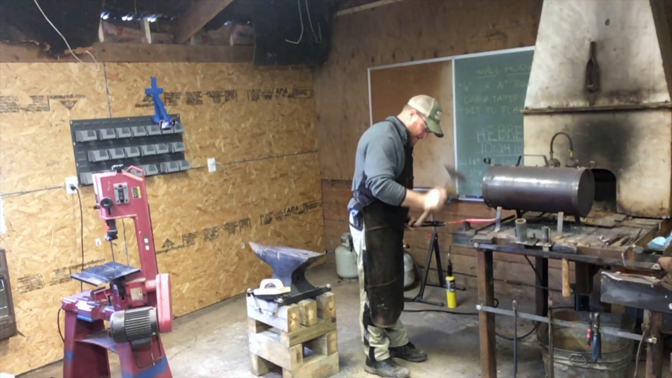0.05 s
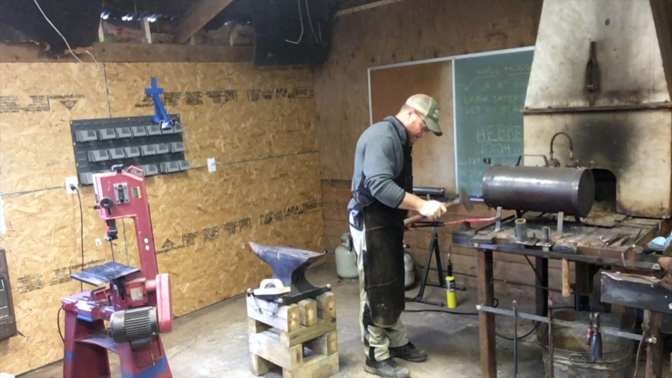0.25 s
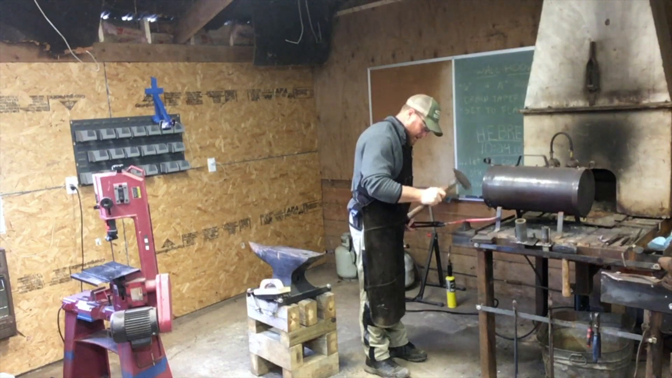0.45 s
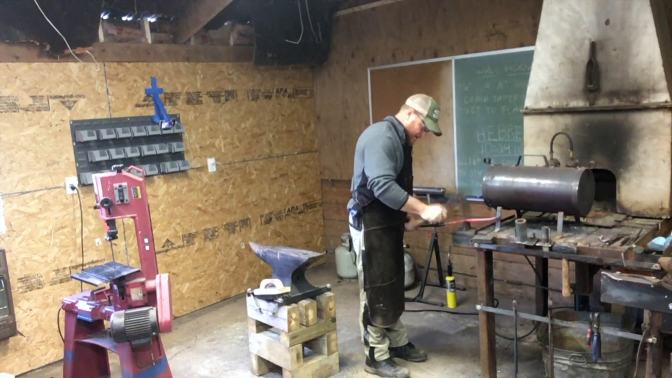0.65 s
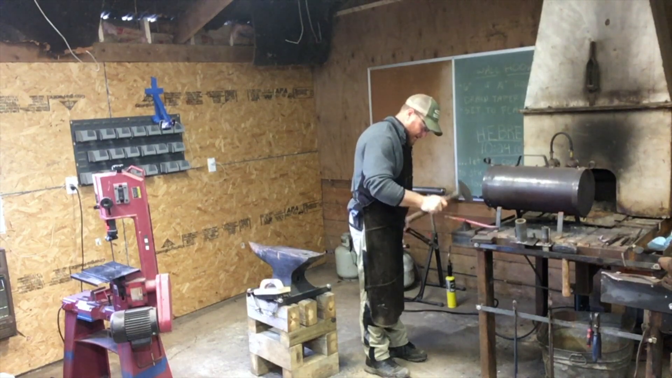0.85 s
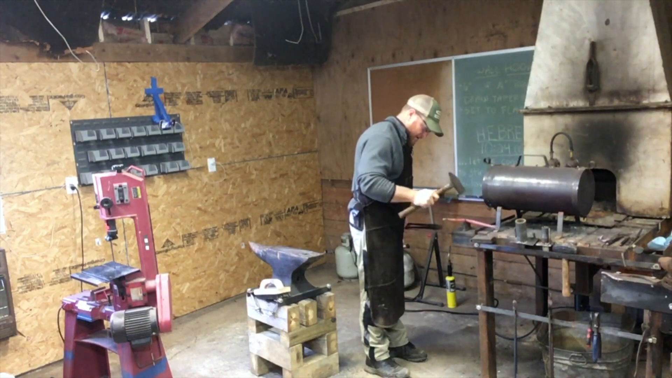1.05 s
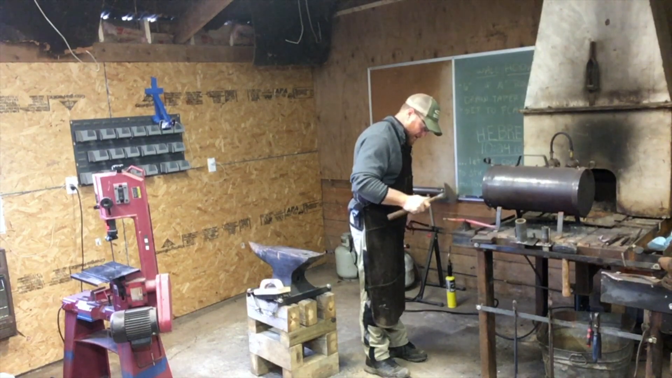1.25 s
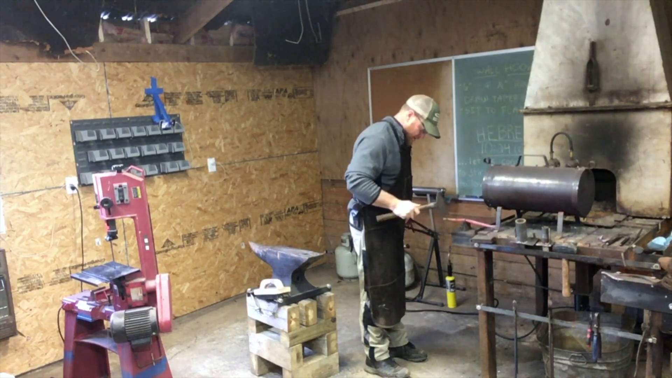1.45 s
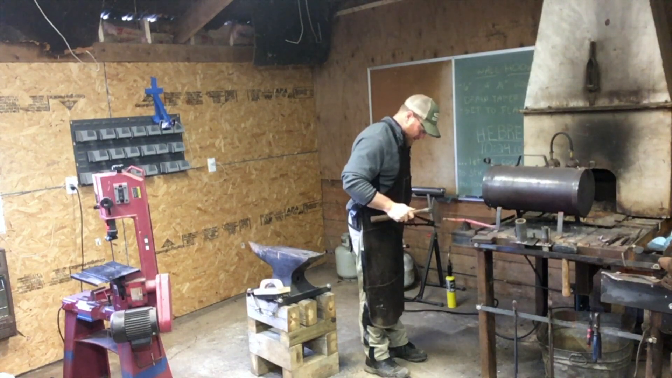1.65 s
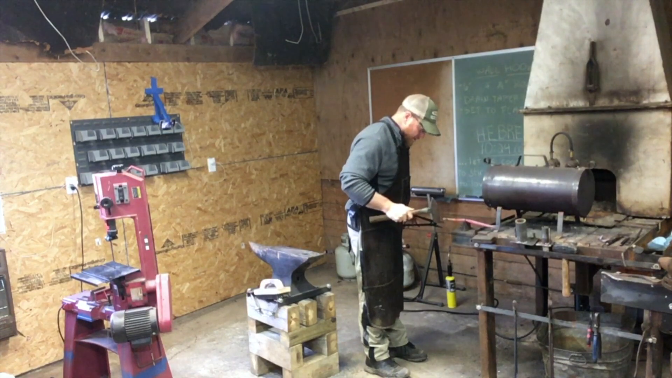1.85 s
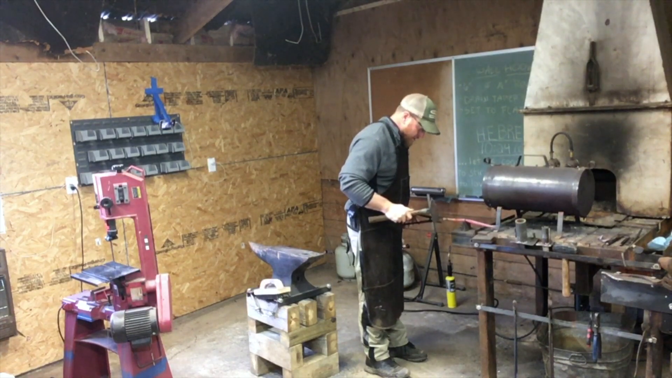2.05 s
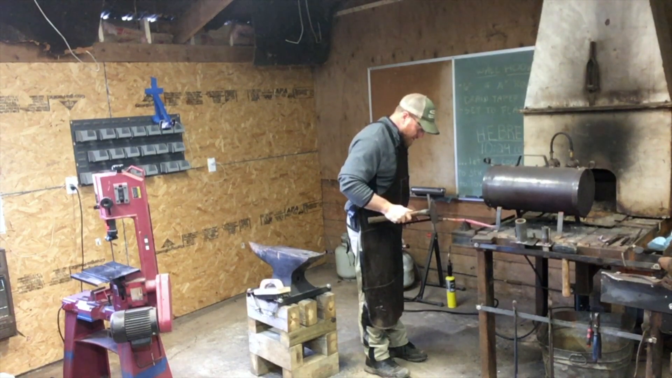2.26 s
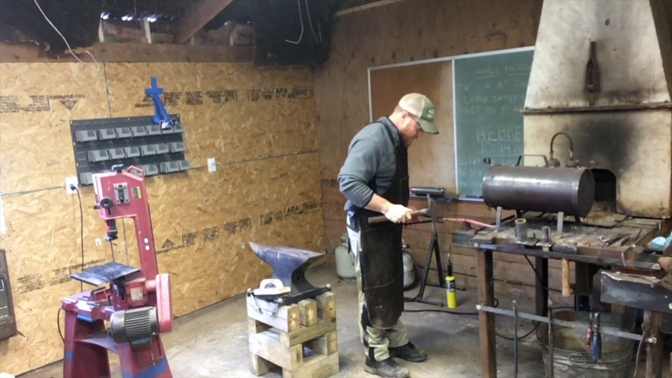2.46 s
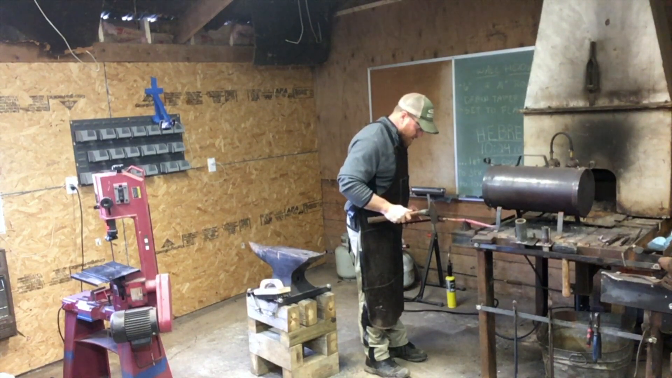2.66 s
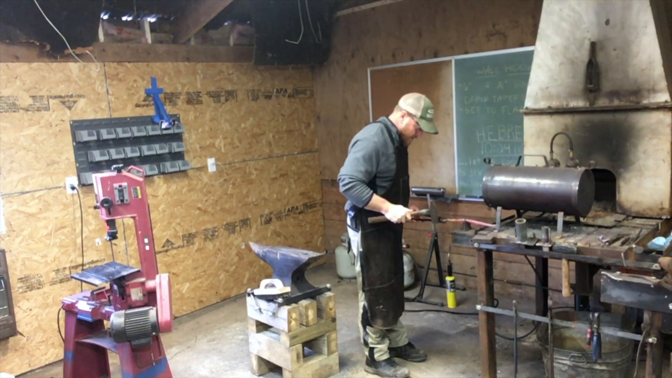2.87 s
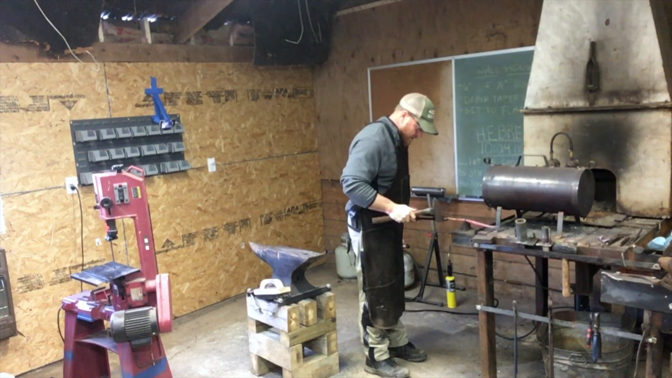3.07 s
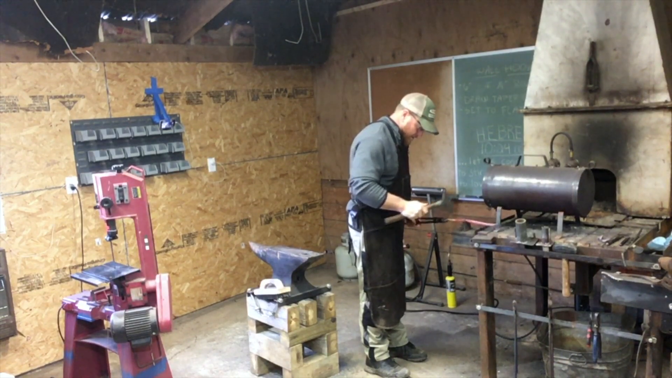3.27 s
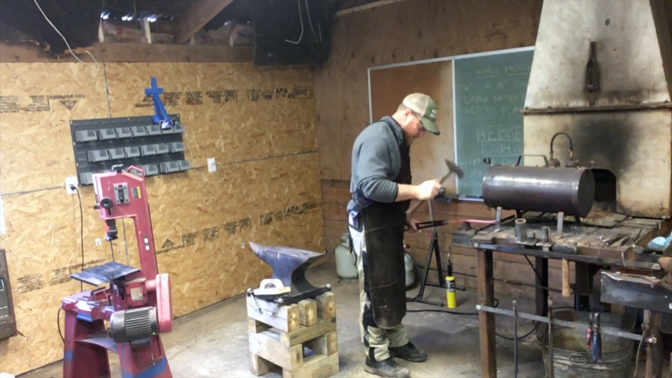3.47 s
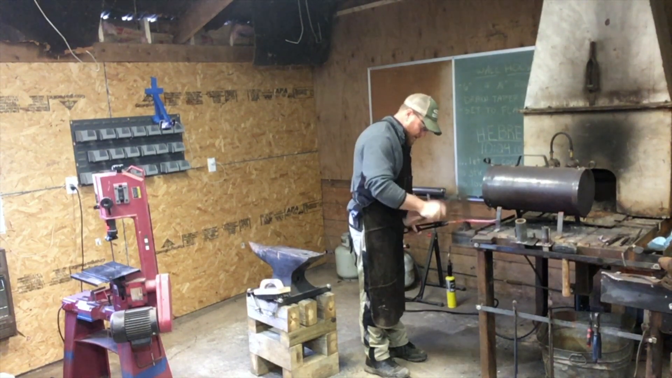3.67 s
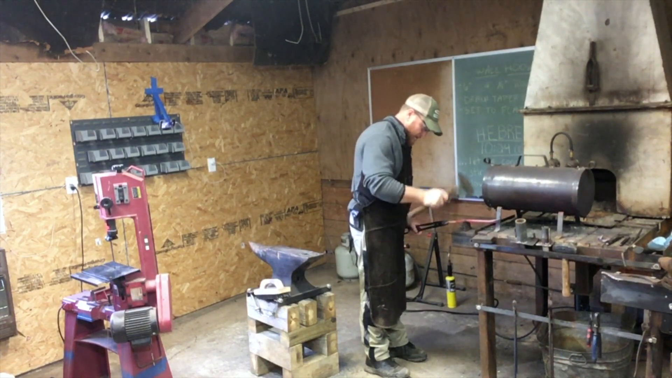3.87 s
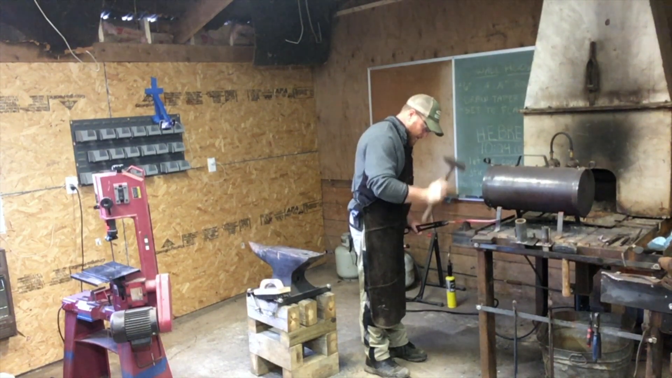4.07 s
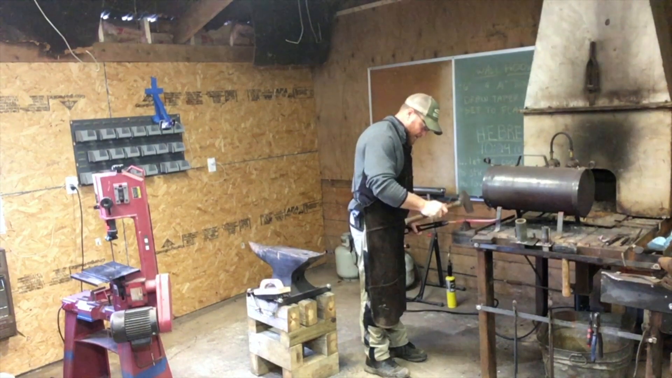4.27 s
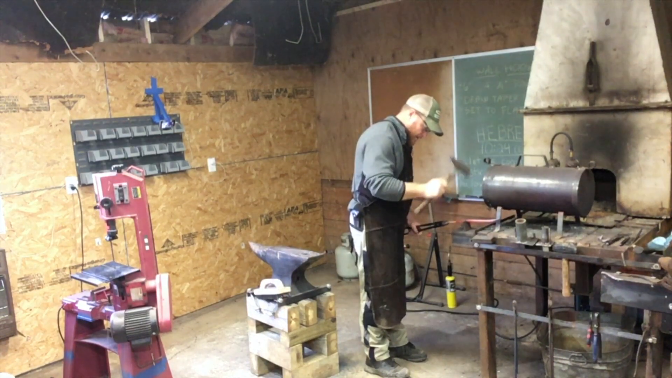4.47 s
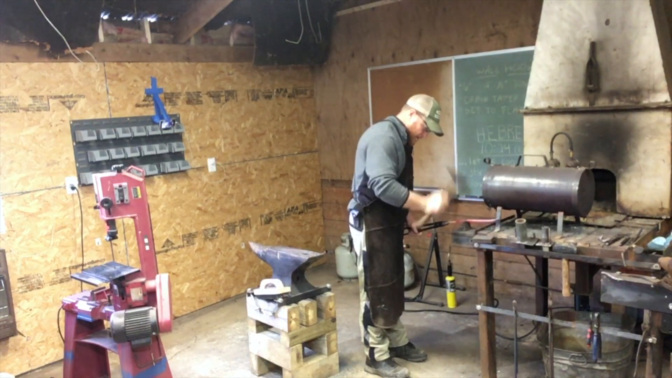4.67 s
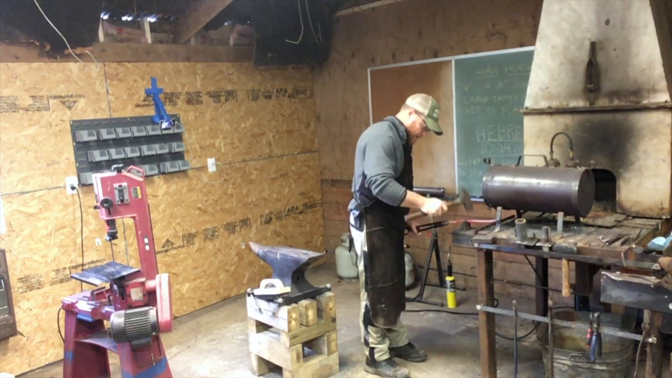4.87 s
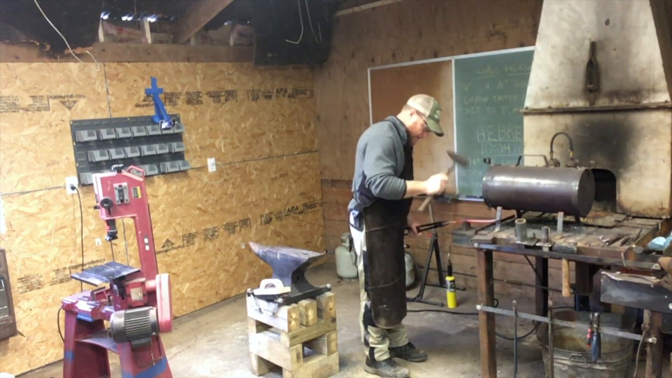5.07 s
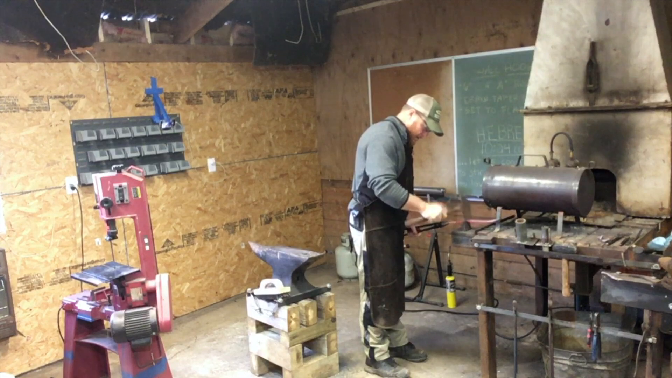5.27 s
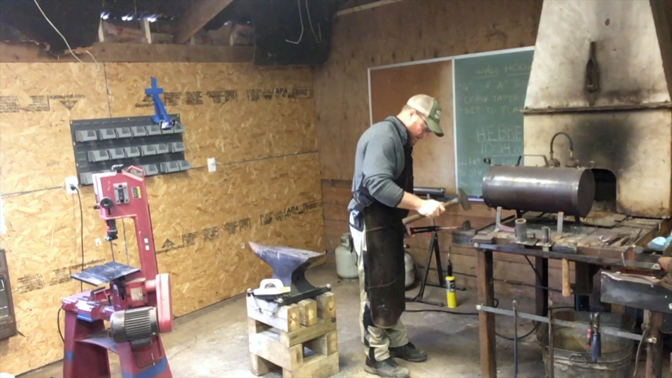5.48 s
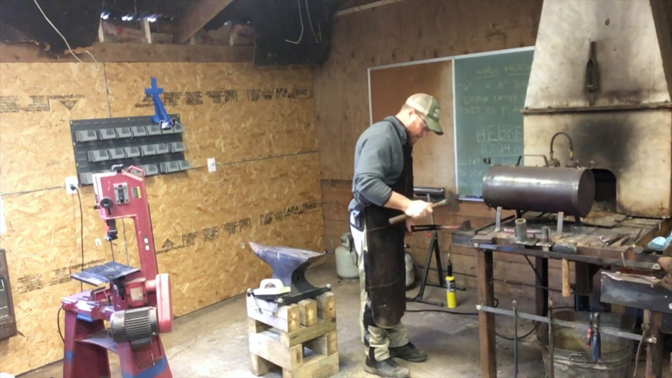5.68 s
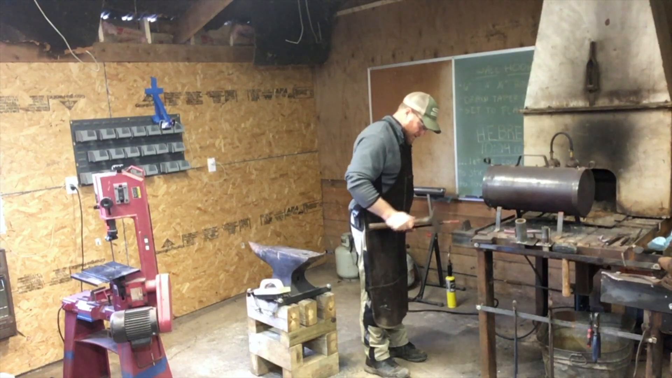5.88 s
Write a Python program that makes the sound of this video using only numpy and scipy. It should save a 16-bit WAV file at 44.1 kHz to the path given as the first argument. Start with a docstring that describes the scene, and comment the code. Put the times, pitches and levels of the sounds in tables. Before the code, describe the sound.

A hand hammer strikes a hot steel bar over a cutting tool twice, each blow a loud, dense clang. In a three-second pause come soft foot shifts, a light steel tick and a brief scrape. Four more blows follow about half a second apart, the last brighter and ringing as it meets the bare tool. A forge hums faintly in the reverberant workshop.

```python
"""Heavy hammer blows cut a hot steel bar over a cutting tool in a reverberant shop. Each impact
excites the modes of bench, tool and hammer head, and reflections build into a dense clang that drives
the recorder's limiter. On the last blow the hammer meets the bare tool, and both ring freely.
In the pause the smith shifts his feet and the steel ticks and scrapes; the forge hums underneath."""
import sys
import numpy as np
from scipy import signal
from scipy.fft import rfft, irfft, next_fast_len
from scipy.io import wavfile
from scipy.ndimage import uniform_filter1d, minimum_filter1d, map_coordinates

SR = 44100
rng = np.random.default_rng(int(sys.argv[2]) if len(sys.argv) > 2 else 0)


def wrap_up_sound(samples):
    """Save the sound to the file named by the first command line argument, as 16-bit audio."""
    columns = np.atleast_2d(samples).T
    # keep every value between -1 and 1, then stretch to whole-number steps
    tamed = np.clip(columns, -1, 1)
    steps = np.round(tamed * 32767).astype(np.int16)
    wavfile.write(sys.argv[1], SR, steps)


N = 261513
TIME = np.arange(N) / SR
RING_TIME = np.arange(SR + SR // 4) / SR

# drone of the flame in its chamber: frequency_hz, density_db
HUM_SPECTRUM = [(30, -61.5), (70, -38), (110, -23.5), (165, 0.5), (210, 1.5), (260, -13), (330, -26),
                (700, -59)]
# hiss of the burner: frequency_hz, density_db
HISS_SPECTRUM = [(40, -34), (100, -18), (300, -7), (500, -2.5), (800, -1.5), (1100, -9), (1600, -12),
                 (2400, -19), (4500, -20), (6000, -24.5), (15000, -35)]
# faint steady tones in the shop's background: pitch_hz, relative_level_db
BACKGROUND_TONES = [(511.4, -81.5), (689.1, -85), (925.9, -89.5), (1523, -93), (2218, -100), (3483, -102)]
# soft footfalls: start_s, level_db
FOOTFALLS = [(1.252, -38.5), (1.537, -41.5), (1.615, -42.5), (1.969, -44), (3.323, -38)]
# slides of the bar over the tool: start_s, length_s, level_db
SLIDES = [(3.08, 0.06, -63), (3.154, 0.057, -48.5)]
# friction noise of a slide: frequency_hz, density_db
SLIDE_SPECTRUM = [(200, -28.5), (500, -1), (900, -4), (1250, -7), (1520, 3.5), (1750, -8), (2300, -8),
                  (2800, -27), (8000, -52)]
# light steel contacts: start_s, level_db
CONTACTS = [(2.692, -73), (2.808, -58)]
# modes excited by a light contact: pitch_hz, level_db, t60_s
CONTACT_MODES = [(3050, -1.5, 0.17), (4300, -0.5, 0.069), (4480, 2.5, 0.17), (4830, -14, .07),
                 (6600, -10, 0.1), (7170, -7.5, 0.23)]
# a blow as it fills the shop: frequency_hz, density_db
CRASH_SPECTRUM = [(40, -53), (100, -38), (170, -6.5), (260, -10), (350, -4), (550, -1), (900, -1.5),
                  (1300, -2), (2200, -6), (3400, -5), (4700, -4), (5700, -11), (9000, -13.5), (15000, -14)]
# build-up of the reflections: frequency_hz, time_constant_s
ECHO_BUILD_UP = [(200, 0.011), (500, 0.011), (1000, 0.022), (4000, 0.012), (12000, .0155)]
# reverberation time of the shop: frequency_hz, t60_s
SHOP_DECAY = [(150, 0.74), (400, 0.75), (900, 0.58), (2000, 0.47), (4500, 0.38), (7000, 0.3), (14000, 0.15)]
# faint late echo, relative to the crash: frequency_hz, level_db
LATE_ECHO = [(50, -39), (170, -15.5), (600, -33.5), (1500, -39.5), (4000, -49.5), (12000, -56)]
# share of a blow's brightness that each band receives: frequency_hz, share
BRIGHTNESS_SHARE = [(1000, 0), (2500, 0.5), (7000, 0.62), (12000, 1)]
# modes of work piece, vice and steel bench: pitch_hz, level_db, t60_s
BENCH_MODES = [(173.2, -29, .6), (214, -30.5, 0.8), (311, -29.5, 0.9), (328, -26, 0.63), (345.5, -22, 0.7),
               (369.4, -28, 0.9), (388, -30, 1), (411.6, -25, 0.56), (445, -20.5, 0.4), (495, -25.5, 0.49),
               (516, -24.5, 1.136), (536.6, -18.5, 0.57), (548.4, -23, 0.82), (719.4, -18, .6),
               (861, -21.5, .62), (1028, -17, 0.56), (1048, -18.5, 0.41), (1095, -25.5, 0.65),
               (1130, -15, .54), (1162, -18.5, .68), (1228, -23.5, 0.53), (1303, -22.5, .48),
               (1388, -21.5, 0.48), (1542, -19.5, 0.5), (1638, -16.5, 0.54), (1768, -24.5, 0.36),
               (1817, -21.5, 0.5), (1944, -23, .4), (2007, -24.5, 0.48), (2136, -26.5, 0.49),
               (2360, -25, .42), (2443, -26, 0.33), (2580, -20.5, 0.26), (2835, -21.5, 0.15),
               (3230, -25, 0.38)]
# modes of the cutting tool: pitch_hz, level_db, t60_s, rise_s
TOOL_MODES = [(3385, -2, .42, .018), (4103, 4, 0.42, .045), (4643, 2.5, .34, .018)]
# modes of the hammer head: pitch_hz, level_db, t60_s
HEAD_MODES = [(8323, 0, 1.05), (10750, -6, .3), (14990, -25, .55)]
# hammer blows: start_s, relative_level_db, brightness_db, tool_db, leading_mode_hz, head_db
HAMMER_BLOWS = [(-0.37, -2, 2.5, -27.5, 3382, -65), (0.151, -0.5, 2, -18.5, 4103, -68),
                (0.700, -0.5, -1.5, -19, 4643, -48.5), (3.744, -1.5, 1.5, -23.5, 4643, -41),
                (4.221, -0.3, -2, -14.5, 3382, -72), (4.771, 0.5, 0.5, -25, 3382, -62),
                (5.339, -1.5, 13, 1.5, 3382, -23.5)]


def amp(db):
    """Amplitude ratio of a level in decibels."""
    return 10 ** (np.asarray(db) / 20)


def unit(x):
    """Normalisation to an rms of 1."""
    return x / np.sqrt(np.mean(x ** 2) + 1e-20)


def along(points, hz):
    """Interpolation of (frequency_hz, value) points on a logarithmic frequency axis."""
    frequencies, values = np.transpose(points)
    return np.interp(np.log(hz + 1), np.log(frequencies), values)


def wobble(rate_hz):
    """Random modulation: a smooth curve through rate_hz Gaussian knots a second."""
    return map_coordinates(rng.standard_normal(1024), [TIME * rate_hz + 2], mode="wrap")


def filtered(x, response):
    """Linear filtering: the spectrum is multiplied by a frequency response."""
    size = next_fast_len(len(x) + SR // 4)
    return irfft(rfft(x, size) * response(np.fft.rfftfreq(size, 1 / SR)), size)[:len(x)]


def noise(spectrum, size=N):
    """Spectral shaping: white noise takes the given colour, at an rms of 1."""
    return unit(filtered(rng.standard_normal(size), lambda hz: amp(along(spectrum, hz))))


def add(track, start_s, sound):
    """Superposition: a sound joins the track from start_s on."""
    start = round(start_s * SR)
    part = sound[max(-start, 0):N - start]
    track[max(start, 0):][:len(part)] += part


def ring(modes, rise_s, blur, blur_hz, scatter_db=1.6):
    """Damped modes, struck at random strengths; interfering reflections vary their level and phase."""
    t, out = RING_TIME, np.zeros(len(RING_TIME))
    coarse = t[::64]
    for hz, db, t60 in modes:
        knots = rng.standard_normal((2, 256))
        curves = [map_coordinates(row, [coarse * blur_hz], mode="wrap") for row in knots]
        in_phase, quadrature = [blur * np.interp(t, coarse, curve) for curve in curves]
        phase = 2 * np.pi * (hz * t + rng.random())
        wave = ((1 + in_phase) * np.sin(phase) + quadrature * np.cos(phase)) / np.sqrt(0.5 + blur ** 2)
        out += amp(db + scatter_db * rng.standard_normal() - 60 * t / t60) * wave
    return out * (1 - np.exp(-t / rise_s)) ** 3


def background_tones(gain_db=8):
    """Phase modulation: faint steady tones in the shop waver slightly in pitch."""
    return sum(amp(db + gain_db) * np.sin(2 * np.pi * hz * TIME + wobble(rate_hz=8))
               for hz, db in BACKGROUND_TONES)


def forge(hum_db=-57, hiss_db=-61.5):
    """Combustion noise: the flame drones in its chamber and the burner hisses faintly."""
    hum = amp(hum_db + 1.7 * wobble(rate_hz=5.9)) * noise(HUM_SPECTRUM)
    hiss = amp(hiss_db + 0.6 * wobble(rate_hz=3)) * noise(HISS_SPECTRUM)
    return hum + hiss


def feet(thump_hz=178, width_s=0.01):
    """Soft impact: weight shifting on the floor excites only a few low cycles."""
    out, age = np.zeros(N), RING_TIME / width_s
    envelope = age ** 2 * np.exp(1 - age ** 2 / 2) / 2
    for start_s, db in FOOTFALLS:
        add(out, start_s, amp(db) * envelope * np.sin(2 * np.pi * thump_hz * RING_TIME))
    return out


def scrapes(attack_s=0.013, t60_s=0.28, grit_db=1.0):
    """Sliding friction: the bar's gritty noise catches quickly, holds, and dies away in the room."""
    envelope = np.zeros(N)
    attack = 1 - np.exp(-RING_TIME / attack_s)
    for start_s, length_s, db in SLIDES:
        release_db = -60 * np.maximum(RING_TIME - length_s, 0) / t60_s
        add(envelope, start_s, amp(db + release_db) * attack)
    return envelope * amp(-grit_db * wobble(rate_hz=130)) * noise(SLIDE_SPECTRUM)


def ticks():
    """Impulse excitation: a light touch of the bar on the tool sets high modes ringing briefly."""
    out = np.zeros(N)
    accent = 1 + 4 * np.exp(-RING_TIME / 0.0033)  # the direct sound stands above its echo
    for start_s, db in CONTACTS:
        add(out, start_s, amp(db) * accent * ring(CONTACT_MODES, rise_s=0.00065, blur=0.88, blur_hz=200))
    return out


def crash(bright_db, ripple_db, direct_share=0.02, steepness=4.33, late_t60_s=2.4):
    """Diffuse reverberation: a blow's echoes pile up, the treble dies first, and a low echo lingers."""
    ripple_hz = np.linspace(0, SR / 2, len(ripple_db))
    burst = noise(CRASH_SPECTRUM, size=2 * SR)
    burst = filtered(burst, lambda hz: amp(np.interp(hz, ripple_hz, ripple_db)))
    hz, t, bands = signal.stft(unit(burst), SR, nperseg=256)
    hz = hz[:, None]
    build_up = direct_share + (1 - np.exp(-t / along(ECHO_BUILD_UP, hz))) ** steepness
    early = amp(-60 * t / along(SHOP_DECAY, hz))
    late = amp(along(LATE_ECHO, hz) - 60 * t / late_t60_s)
    brightness = amp(bright_db * along(BRIGHTNESS_SHARE, hz))
    return signal.istft(bands * build_up * np.hypot(early, late) * brightness, SR, nperseg=256)[1]


def tool(lead_hz, other_modes_db=-11.5):
    """Modal excitation: the point of impact decides which mode of the cutting tool leads."""
    lead = np.argmin([abs(mode[0] - lead_hz) for mode in TOOL_MODES])
    return sum(ring([(hz, db + other_modes_db * (k != lead), t60)], rise_s, blur=0.55, blur_hz=62)
               for k, (hz, db, t60, rise_s) in enumerate(TOOL_MODES))


def hammer_head(tilt_db_per_octave):
    """Free vibration of the head: a harder contact reaches its higher modes."""
    lowest_hz = HEAD_MODES[0][0]
    modes = [(hz, db + tilt_db_per_octave * np.log2(hz / lowest_hz), t60) for hz, db, t60 in HEAD_MODES]
    return ring(modes, rise_s=0.022, blur=0.35, blur_hz=20)


def hammer(crash_gain_db=-3.0, bench_gain_db=-0.5):
    """Impacts excite bench and shop; tool and head ring more when less soft steel damps the contact."""
    out = np.zeros(N)
    # countless weak steel resonances ripple the spectrum above the bass
    ripple_db = 3.2 * rng.standard_normal(1400) * np.clip(np.arange(1400) / 90 - 0.5, 0, 1)
    for start_s, db, bright_db, tool_db, lead_hz, head_db in HAMMER_BLOWS:
        add(out, start_s, amp(db + crash_gain_db) * crash(bright_db, ripple_db))
        bench = ring(BENCH_MODES, rise_s=0.025, blur=0.45, blur_hz=30)
        add(out, start_s, amp(db + bench_gain_db) * bench)
        add(out, start_s, amp(tool_db) * tool(lead_hz))
        add(out, start_s, amp(head_db) * hammer_head(bright_db))
    return out


def scene():
    """Superposition of hammering, handling and the shop's background at one microphone."""
    return (hammer() + ticks() + scrapes() + feet() + forge() + background_tones())[None]


def limit(x, ceiling=0.7, hold_s=0.0008):
    """Look-ahead limiting: the gain falls just before a peak and holds it to the ceiling."""
    size = int(hold_s * SR) | 1
    gain = minimum_filter1d(np.minimum(1, ceiling / (np.abs(x) + 1e-9)), size)
    return x * uniform_filter1d(gain, size)


def suppress(x, depth_db=9, knee_db=4):
    """Spectral gating: each band is turned down as it sinks below its threshold."""
    hz, _, bands = signal.stft(x, SR, nperseg=512)
    power = np.abs(uniform_filter1d(np.abs(bands) ** 2, size=7, axis=0))
    threshold_db = along([(200, -78.5), (600, -64.5), (1500, -66.5), (4000, -70.5), (12000, -86.5)], hz)
    excess_db = 10 * np.log10(power + 1e-20) - threshold_db[:, None]
    gain = amp(-depth_db * (1 - np.tanh(excess_db / knee_db)) / 2)
    return signal.istft(bands * gain, SR, nperseg=512)[1][:N]


def record(dry, low_hz=48, top_hz=15300):
    """Dynamic control and band limiting: the recorder curbs peaks, faint tails, deep bass and top."""
    def passband(hz):
        return (hz / np.hypot(hz, low_hz)) ** 2 / np.sqrt(1 + (hz / top_hz) ** 300)
    return filtered(suppress(limit(dry[0])), passband)[None]


dry = scene()
out = record(dry)
wrap_up_sound(out)
```